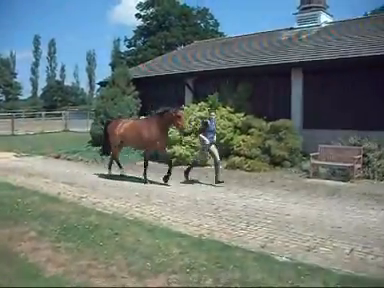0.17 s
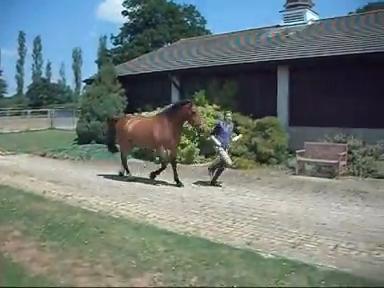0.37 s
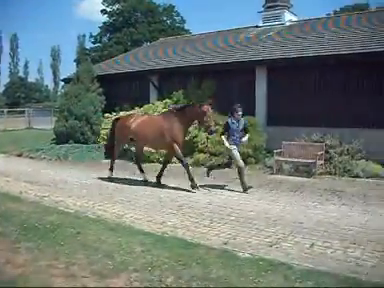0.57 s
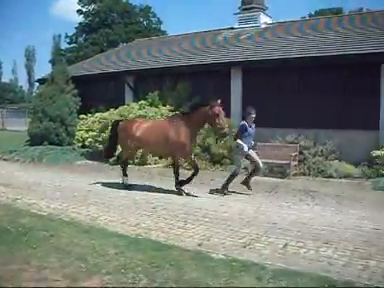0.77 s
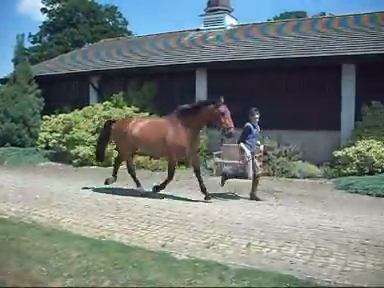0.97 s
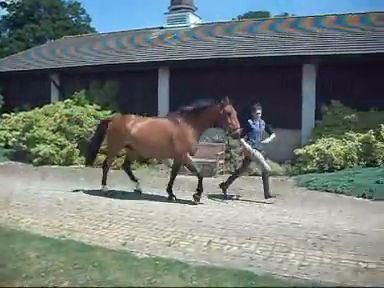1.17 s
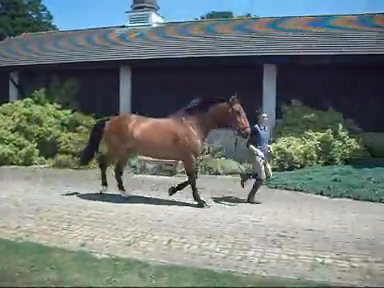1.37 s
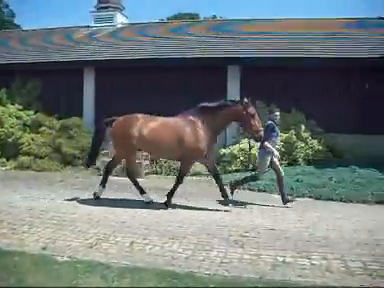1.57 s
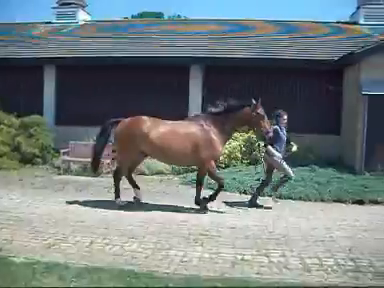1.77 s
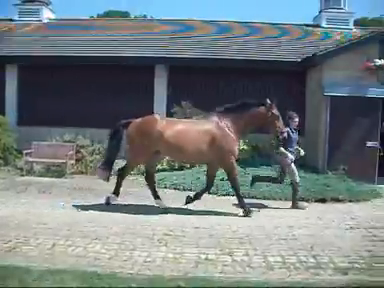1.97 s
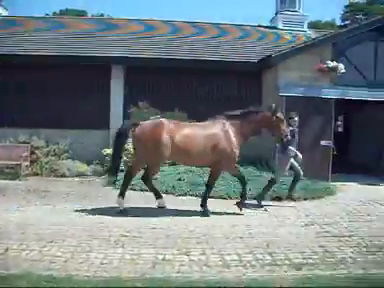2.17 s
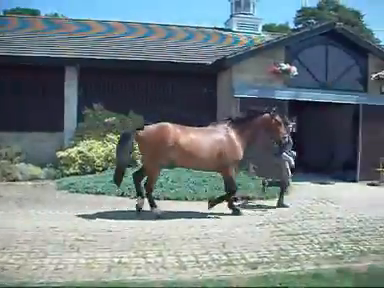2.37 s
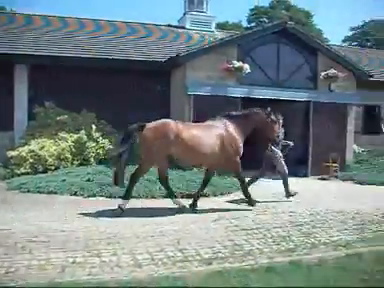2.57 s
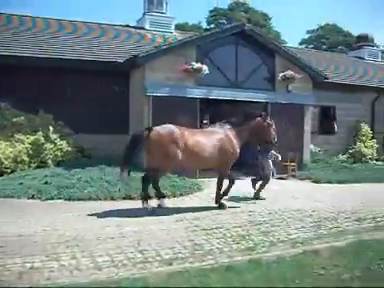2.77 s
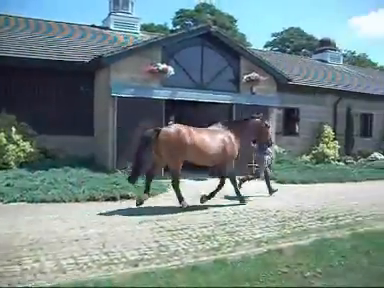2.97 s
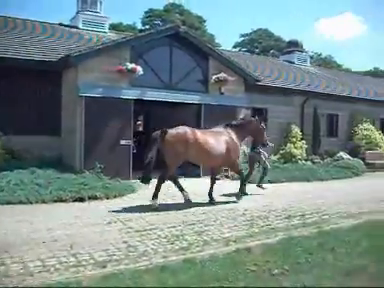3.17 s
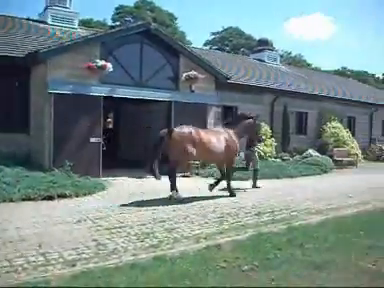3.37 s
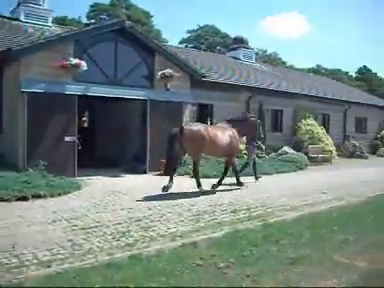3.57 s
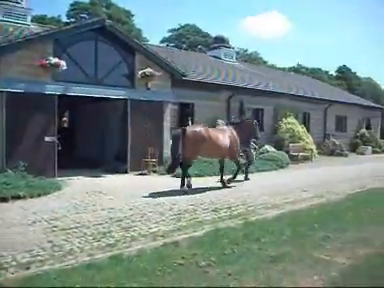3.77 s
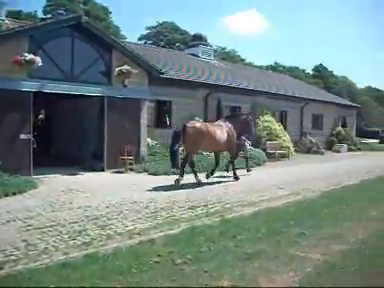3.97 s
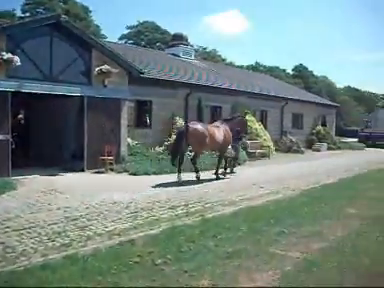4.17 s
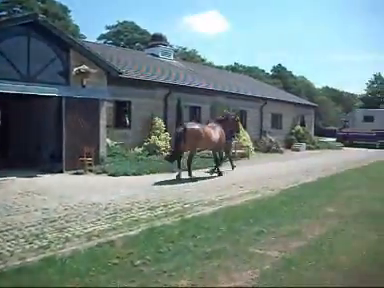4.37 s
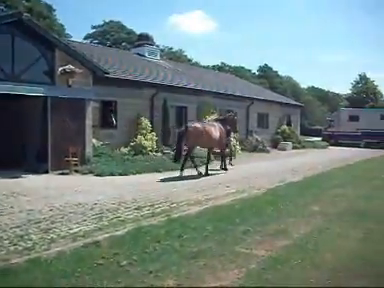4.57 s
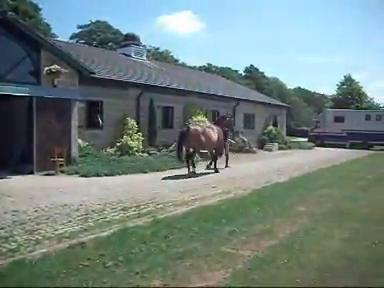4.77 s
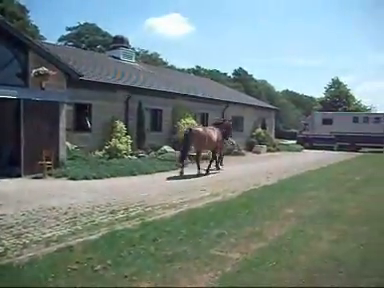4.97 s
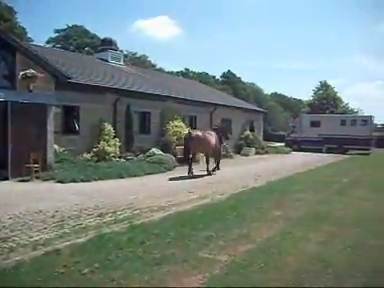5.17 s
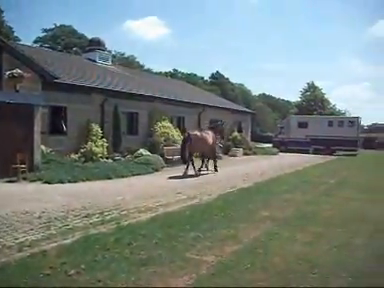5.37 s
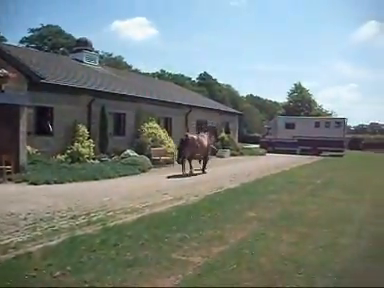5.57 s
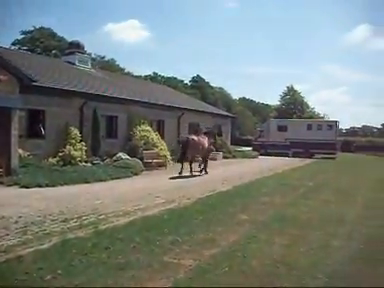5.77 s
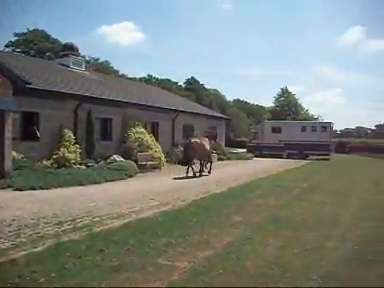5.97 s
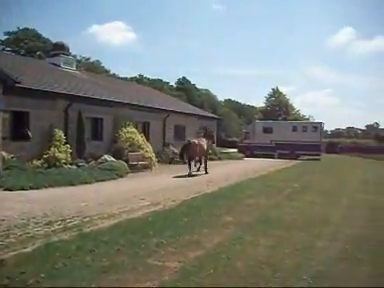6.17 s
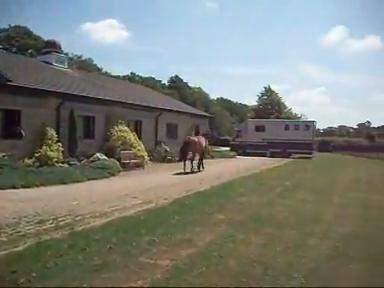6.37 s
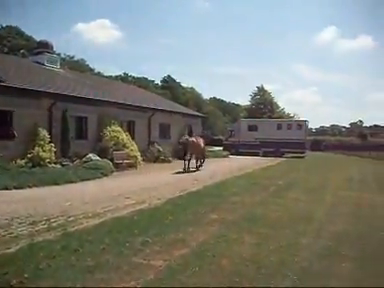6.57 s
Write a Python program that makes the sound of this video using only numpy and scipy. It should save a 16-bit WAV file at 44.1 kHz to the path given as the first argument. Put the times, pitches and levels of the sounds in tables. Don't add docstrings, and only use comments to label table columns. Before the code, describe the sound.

A shod horse trots on block paving beside a stable wall, about three paired hoofbeats per second, each a tight cluster of iron click, hollow clop and skittering grit. Wind thumps a small outdoor microphone, worst near one and a half seconds. The blows grow hardest and briefly overload midway, then soften as the horse moves off. A runner's boots scuff faintly and a distant bird twitters.

```python
import sys
import numpy as np
from scipy import signal
from scipy.io import wavfile
from scipy.ndimage import uniform_filter1d

SR = 44100
rng = np.random.default_rng(int(sys.argv[2]) if len(sys.argv) > 2 else 0)


def attenuation_scalar(level_db):
    decades = np.asarray(level_db, float) / 20
    return 10 ** decades


def unload_wav(signal):
    wavfile.write(
        sys.argv[1],
        SR,
        np.round(np.clip(np.atleast_2d(signal).T, -1, 1) * 32767).astype(np.int16),
    )


N = 291060

# (time [s], gust level [dB])
BREEZE = [(0, -30.5), (0.699, -35.5), (1.0, -39), (1.3, -29), (1.5, -30), (1.749, -31.5), (2.0, -28.5),
          (2.3, -29), (2.45, -33.5), (3.1, -40), (4.5, -40), (6.6, -40)]
# (frequency [Hz], density [dB per Hz])
AIR_COLOUR = [(250, -26.5), (400, -4.5), (590, 4.5), (1370, -4.5), (3670, -7), (5070, -13), (7200, -28.5),
              (9000, -29.5)]
# (time [s], peak level [dB], frequency [Hz])
BUFFETS = [(0.0388, -20.5, 89), (0.1066, -20, 120), (0.4503, -22, 164), (0.6601, -22, 69),
           (1.0837, -17.5, 68), (1.1051, -17, 172), (1.1426, -20, 110), (1.1862, -9, 207),
           (1.2685, -14.5, 99), (1.3081, -18, 136), (1.3398, -6, 128), (1.4037, -15, 130),
           (1.43, -14.5, 107), (1.4746, -5.5, 250), (1.5151, -10, 210), (1.5367, -15.5, 115),
           (1.5607, -14, 171), (1.5993, -21.5, 101), (1.6391, -13, 163), (1.6627, -21, 90),
           (1.8126, -18.5, 220), (2.0466, -12, 77.6), (2.1386, -16, 245), (2.1881, -17, 112),
           (2.2128, -13, 121), (2.2871, -23, 77), (2.3086, -21, 90), (2.4301, -21, 256), (2.7656, -20, 150),
           (3.4309, -18.5, 250)]
# (time [s], iron level [dB], heel clop level [dB], roll from heel to flat [s], flat clop level [dB])
LEADING_HOOF = [(0.0912, -16.5, -15.5, 0.01, -11.5), (0.4357, -20, -14.5, 0.013, -12.5),
                (.759, -10.5, -12, .0100, -12.5), (1.0894, -14, -16.5, 0.016, -11),
                (1.4224, -13, -6, 0.013, -11), (1.763, -16.5, -11.5, 0.0073, -3),
                (2.083, -9.5, -5.5, 0.0052, -7), (2.4308, -14, -3.5, 0.0052, -8.5),
                (2.7519, -5, -11, 0.0059, -10), (3.0986, -18.5, -6, 0.0083, -12),
                (3.4295, 1.5, -5.5, 0.0053, -7.5), (3.7668, -10.5, -12.5, 0.0058, -5),
                (4.0974, -16.5, -15, .01, -11.5), (4.4548, -15.5, -15.5, 0.014, -10.5),
                (4.7957, -10, -14.5, 0.014, -8.5), (5.169, -15.5, -17, 0.0075, -12.5),
                (5.5186, -15, -16.5, 0.012, -13.5), (5.8869, -20, -29, 0.013, -16),
                (6.2522, -11.5, -18.5, 0.0084, -15.5)]
# (time [s], iron level [dB], heel clop level [dB], roll from heel to flat [s], flat clop level [dB])
TRAILING_HOOF = [(0.1387, -7.5, -11.5, 0.0045, -16), (0.4824, -8.5, -6.5, .006, -36),
                 (0.8003, -5, -21, .0045, -12.5), (1.1315, -3.5, -5.5, .0056, -6.5),
                 (1.4662, -2, -12, .0046, -17), (1.7993, -3, -6, .007, -6),
                 (2.1227, -19.5, -16.5, .0095, -7), (2.4538, -6.5, -13, .009, -5.5),
                 (2.7897, -4.5, -8, .0062, -9.5), (3.1264, -2, -5, .0065, -6.5),
                 (3.4594, -14, -12, .0128, -6), (3.7971, -14.5, -4, 0.0033, -18),
                 (4.1326, -8, -11, .0066, -14.5), (4.4867, -6, -9.5, .0145, -16.5),
                 (4.8373, -8.5, -18.5, .006, -15.5), (5.1861, -8.5, -10, 0.0066, -9),
                 (5.5562, -8, -9, .008, -24), (5.9327, -11.5, -8, .0055, -14),
                 (6.305, -7.5, -6.5, .0073, -20)]
FLAT_IRON_DB = [-8, -8.5]
# (time [s], iron level [dB], clop level [dB])
EDGE_CATCHES = [(0.168, -15, -38), (0.4166, -20, -30), (0.4787, -26, -10.5), (.5102, -19.5, -16.5),
                (0.828, -16, -22.5), (1.1197, -37, -14), (1.1634, -18, -15.5), (1.497, -13, -20.5),
                (1.829, -16, -41), (2.0918, -10.5, -13), (2.0984, -19, -13), (2.4222, -17.5, -14.5),
                (2.4589, -8.5, -26), (2.7637, -9.5, -10), (2.801, -13.5, -29), (3.0924, -14.5, -25),
                (3.1312, -9.5, -34), (3.421, -10.5, -5), (3.4486, -15, -10.5), (3.4665, -8, -7),
                (3.7805, -25.5, -9.5), (4.1536, -24, -20), (4.4794, -24.5, -24), (4.8305, -28, -18),
                (4.854, -21.5, -20.5), (5.19, -7.5, -30), (5.5495, -21, -20), (5.9364, -5, -29),
                (5.956, -19.5, -21), (6.3002, -15.5, -21)]
# (time [s], peak level [dB], brightest frequency [Hz])
TOE_GLANCES = [(0.4834, -11, 3810), (1.469, -13, 3360), (1.7988, -1.5, 3740), (1.8078, -17.5, 3730),
               (2.123, -3.5, 4360), (2.1266, -10, 4600), (2.1556, -23, 4700), (2.1606, -22.5, 4700),
               (3.1417, -11.5, 2780), (3.435, -8, 2860), (3.4595, -7, 4180), (3.4713, -25, 4100),
               (4.8058, -20, 2440), (5.1622, -22, 3000), (6.2586, -25.5, 2460), (6.3236, -27, 2600)]
# (time [s], peak level [dB])
STONES = [(.5547, -36), (.6054, -30.5), (.9934, -32), (1.1939, -22), (1.224, -25.5), (1.2664, -21),
          (1.8634, -26), (1.9175, -24), (1.9398, -26.5), (2.3364, -26), (2.5003, -27), (2.523, -19.5),
          (2.5864, -28.5), (2.821, -19), (2.892, -25), (2.9784, -27), (3.1964, -21.5), (3.26, -19),
          (3.2793, -27.5), (3.8383, -36.5), (3.8554, -20), (3.9007, -26), (4.0303, -26), (4.059, -27.5),
          (4.6445, -29), (5.4475, -24), (5.7905, -26.5), (6.051, -27.5), (6.1552, -27.5)]
# (time [s], knock level [dB], scuff level [dB])
BOOTS = [(.745, -32, -23), (1.234, -34, -30), (1.506, -28, -28), (1.745, -26, -39), (1.95, -27, -37),
         (2.6012, -31, -24), (2.6436, -19.5, -36), (2.722, -36, -29.5), (3.1561, -22, -31.5),
         (3.2986, -34, -22.5), (3.4966, -21.5, -28), (4.523, -36, -36), (4.551, -33, -29.5),
         (4.59, -32, -33.5), (4.7422, -47, -27), (4.8697, -23, -34), (5.0671, -38, -33.5),
         (5.213, -21.5, -20), (5.3551, -37, -28.5), (6.096, -40, -31)]
# (frequency [Hz], near level [dB], near decay t60 [s], far level [dB], far decay t60 [s])
YARD = [(587, -31, 0.033, -54, 0.76), (1500, -25, 0.019, -52.5, 1), (3350, -25.5, 0.027, -50.5, 0.53),
        (7600, -30.5, 0.011, -37, 0.047)]
# (time [s], delay behind the blow [s], level [dB])
WALL_SLAP = [
    (0, 0.025, -11.5),
    (2.2, 0.04, -22.5),
    (3.499, .024, -17.5),
    (6.6, 0.02, -19),
]
# (time [s], level [dB], fall of pitch [Hz])
TWITTER = [
    (.545, -50, 500),
    (.625, -52, 700),
    (.697, -42, 1200),
    (.925, -43, 1300),
    (2.212, -46, 600),
    (2.293, -46, 900),
    (2.378, -47, 900),
    (2.535, -48, 800),
    (2.61, -46, 900),
    (4.428, -45, 900),
]


def at_hz(points, hz):
    table = np.array(points)
    return np.interp(np.log(hz), np.log(table[:, 0]), table[:, 1])


def rms_one(x):
    return x / np.sqrt(np.mean(x ** 2) + 1e-20)


def band(x, low_hz, high_hz):
    return signal.sosfilt(signal.butter(2, [low_hz, high_hz], "band", fs=SR, output="sos"), x)


def drift(rate):
    r = np.exp(-80 * np.pi * rate / SR)
    white = rng.standard_normal(N // 40 + 2002)
    slow = signal.lfilter([1], [1, -2 * r, r * r], white)[2000:]
    return np.interp(np.arange(N) / 40, np.arange(len(slow)), rms_one(slow))


def ring(clicks, hz, t60):
    r, w = attenuation_scalar(-60 / (t60 * SR)), 2 * np.pi * hz / SR
    return signal.lfilter([0, np.sin(w)], [1, -2 * r * np.cos(w), r * r], clicks + 1e-18)


def bursts(rows, rise_cycles, trim_db, glide):
    out = np.zeros(N + SR)
    phases = rng.random((len(rows), 1)) * 2 * np.pi
    for (s, level_db, hz), phase in zip(rows, phases):
        rise_s = rise_cycles / hz
        u = np.arange(int(12 * rise_s * SR)) / SR / rise_s
        cycles = rise_cycles * u * (1 - glide * (u - 2))
        wave = u * np.exp(1 - u) * np.sin(2 * np.pi * cycles + phase)
        start = max(round((s - rise_s) * SR), 0)
        out[start:start + len(u)] += attenuation_scalar(level_db + trim_db) * wave
    return out[:N]


def open_air(air_db):
    out, together = 0, drift(6)
    edges = 300 * 2 ** (np.arange(16) / 3)
    white = rng.standard_normal((2, N))
    for k, (low, high) in enumerate(zip(edges, edges[1:])):
        flicker_db = 1.2 * together + 1.4 * drift(20)
        colour_db = at_hz(AIR_COLOUR, np.sqrt(low * high))
        out = out + attenuation_scalar(colour_db + flicker_db) * band(white[k % 2], low, high)
    return attenuation_scalar(air_db) * rms_one(out)


def wind():
    t = np.arange(N) / SR
    gust_db = np.interp(t, *np.transpose(BREEZE))
    squall_db = 13 * np.exp(-((t - 1.46) / 0.12) ** 2)
    flutter_db = -41.5 + 0.34 * (gust_db + 40) + squall_db
    rumble = rms_one(band(rng.standard_normal(N), 7.4, 63.3) * attenuation_scalar(0.52 * drift(5.3)))
    flutter = rms_one(band(rng.standard_normal(N), 75, 330) * attenuation_scalar(2.2 * drift(20)))
    buffets = bursts(BUFFETS, rise_cycles=0.4, trim_db=1.0, glide=0.047)
    return attenuation_scalar(gust_db) * rumble + attenuation_scalar(flutter_db) * flutter + buffets


def grit():
    born = rng.random(N) < 110 * attenuation_scalar(4.0 * drift(3)) / SR
    sizes = attenuation_scalar(3.2 * np.minimum(rng.exponential(1, N), 4)) * rng.choice([-1, 1], N)
    dealt = rng.integers(0, 8, N)
    tones = 0
    for k, hz in enumerate(np.geomspace(700, 6000, 8)):
        tones = tones + ring(born * sizes * (dealt == k), hz, 6.9 / hz)
    return attenuation_scalar(-40) * (1.18 * tones + 0.59 * band(born * sizes, 900, 4800))


def contacts():
    rock_s, rock_loss_db, rock_iron_loss_db = .0055, 7, 4.5
    spray_s, spray_db = .034, -17
    clop_lag_s, lowest_clop_hz = 0.00038, 697
    edge_hz, edge_rise, flat_hz = 914, .15, 801
    iron_hz, leading_dull, boot_hz = 3000, 0.91, 684

    hooves = np.array(LEADING_HOOF + TRAILING_HOOF)
    s, iron_db, heel_db, roll, flat_db = hooves.T
    edges = np.vstack([hooves[:, :3], EDGE_CATCHES])
    touch = np.arange(3)
    chance = rng.standard_normal((len(s), 4, 3))
    landed_s = (s + roll)[:, None]
    flat_s = landed_s + rock_s * touch * (1 + .15 * chance[:, 0])
    rock_db = flat_db[:, None] - touch * (rock_loss_db + 1.5 * chance[:, 1])
    times = np.r_[edges[:, 0], flat_s.ravel()]
    spread = rng.standard_normal((len(times), 2))

    edge_clop_hz = edge_hz * attenuation_scalar(edge_rise * np.clip(edges[:, 1] - edges[:, 2], -12, 12))
    clop_hz = np.r_[edge_clop_hz, np.full(flat_s.size, flat_hz)] * attenuation_scalar(.7 * spread[:, 0])
    clop_db = np.r_[edges[:, 2], rock_db.ravel()]
    clops = np.c_[times + clop_lag_s, clop_db, np.maximum(clop_hz, lowest_clop_hz)]

    muffle_db = np.repeat(FLAT_IRON_DB, len(LEADING_HOOF))[:, None]
    flat_iron_db = rock_db + muffle_db - rock_iron_loss_db * touch + 0.95 * chance[:, 2]
    click_db = np.r_[edges[:, 1], flat_iron_db.ravel()]
    clicks = np.c_[times, click_db, iron_hz * attenuation_scalar(.7 * spread[:, 1])]
    clicks[:len(LEADING_HOOF), 2] *= leading_dull

    chips_s = landed_s + spray_s * rng.random((len(s), 2))
    chips_db = np.maximum(heel_db, flat_db)[:, None] + spray_db + 2.0 * chance[:, 3, :2]
    chips = np.c_[chips_s.ravel(), chips_db.ravel()]
    boots = np.array(BOOTS)
    knocks = np.c_[boots[:, :2], np.full(len(boots), boot_hz)]
    scuffs = boots[:, ::2]
    return np.vstack([clops, knocks]), np.vstack([clicks, TOE_GLANCES]), np.vstack([STONES, chips, scuffs])


def shoes(clicks, ticks):
    spread_hz = 2500 * attenuation_scalar(2.0 * rng.standard_normal((len(ticks), 1)))
    light = [(s, level_db, hz) for (s, level_db), (hz,) in zip(ticks, spread_hz)]
    rows = list(clicks) + light
    rise_s = .0004
    u = np.arange(SR // 100) / SR / rise_s
    out, grains = np.zeros(N), rng.standard_normal((len(rows), len(u)))
    for (s, level_db, hz), grain in zip(rows, grains):
        start = round((s - 1.5 * rise_s) * SR)
        edge_gain = attenuation_scalar(-19 + 0.16 * (level_db + 11.0))
        core = band(grain, hz * 0.66, hz * 1.215) + edge_gain * band(grain[::-1], 980, 6200)
        tone = core * u * np.exp(1 - u)
        height = np.sqrt(uniform_filter1d(np.abs(signal.hilbert(tone)) ** 2, size=26).max())
        out[start:start + len(u)] += attenuation_scalar(level_db + 0.13) * tone / height
    knocks = [(s, level_db, hz * 0.37) for s, level_db, hz in light]
    return out + bursts(knocks, rise_cycles=0.91, trim_db=-5.0, glide=0.011)


def soles(blows):
    thuds = [(s, level_db, hz * 0.33) for s, level_db, hz in blows]
    walls = []
    for (s, level_db, hz), (a, b) in zip(blows, rng.standard_normal((len(blows), 2))):
        walls.append((s, level_db + 1.4 * np.clip(a, -2, 1), 1400 * attenuation_scalar(2.05 * b)))
    clop = bursts(blows, rise_cycles=0.76, trim_db=0.4, glide=0.034)
    overtone = bursts(walls, rise_cycles=1.174, trim_db=-6.0, glide=0.022)
    thud = bursts(thuds, rise_cycles=0.46, trim_db=-17.0, glide=0.013)
    return clop + overtone + thud


def decay(power, level_db, t60):
    return signal.lfilter([0, attenuation_scalar(2 * level_db)], [1, -attenuation_scalar(-120 / (t60 * SR))], power)


def yard(x):
    out, table = 0, np.array(YARD)
    edges = 450 * 2 ** np.arange(0, 4.6, .5)
    white, shared = rng.standard_normal((2, N)), drift(87)
    t = np.arange(N) / SR
    s, delay, slap_db = np.transpose(WALL_SLAP)
    heard, slap_gain = t - np.interp(t, s, delay), attenuation_scalar(2 * np.interp(t, s, slap_db))
    thinning = attenuation_scalar(2 * -5.5 * np.maximum(t - 6.45, 0))
    for k, (low, high) in enumerate(zip(edges, edges[1:])):
        middle = np.sqrt(low * high)
        near_db, near_t60, far_db, far_t60 = [at_hz(table[:, [0, c]], middle) for c in range(1, 5)]
        lumps = attenuation_scalar(4.0 * shared + 2.5 * drift(120) + 3.5 * drift(14) - 1.5)
        power = band(x, low, high) ** 2 + 1e-18
        gathered = uniform_filter1d(power, size=441, origin=220)
        near = decay(gathered, near_db, near_t60)
        far = decay(power, far_db, far_t60)
        smeared = np.abs(uniform_filter1d(power, size=176))
        slap = slap_gain * np.interp(heard, t, smeared)
        envelope = np.sqrt(near * lumps ** 2 * thinning + slap + far)
        out = out + envelope * rms_one(band(white[k % 2], low, high))
    return out


def bird():
    out, u = np.zeros(N), np.linspace(0, 1, SR // 36)
    for s, level_db, fall_hz in TWITTER:
        pitch_hz = 4000 + 500 * u - fall_hz * u ** 2
        start = round(s * SR)
        mirror = .25 * np.sin(2 * np.pi * np.cumsum(SR / 4 - pitch_hz) / SR)
        whistle = np.sin(2 * np.pi * np.cumsum(pitch_hz) / SR) + mirror
        out[start:start + len(u)] += attenuation_scalar(level_db) * np.sin(np.pi * u) * whistle
    return out * attenuation_scalar(1.5 * drift(90))


def scene():
    clops, clicks, ticks = contacts()
    ground = shoes(clicks, ticks) + soles(clops) + grit()
    return (ground + yard(ground) + bird() + open_air(-43.5) + wind())[None]


def roll_off(x):
    return signal.sosfilt(signal.butter(12, 8800, fs=SR, output="sos"), x)


def record(dry):
    b, a = signal.iirnotch(5520, 13.0, fs=SR)
    coloured = dry + .55 * (signal.lfilter(b, a, dry) - dry)
    top_cut = signal.cheby2(10, 50, 8700 * 1.08, fs=SR, output="sos")
    clipped = np.clip(signal.sosfilt(top_cut, coloured) - .004, -.92, .92)
    splatter_cut = signal.cheby2(8, 45, 13500, fs=SR, output="sos")
    return roll_off(signal.sosfilt(splatter_cut, clipped))


dry = scene()
out = record(dry)
unload_wav(out)
```